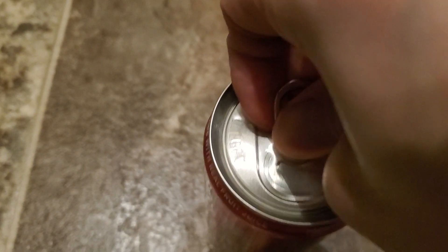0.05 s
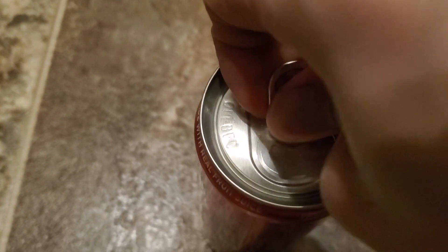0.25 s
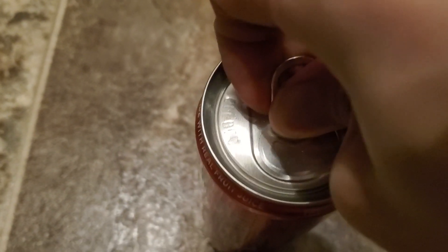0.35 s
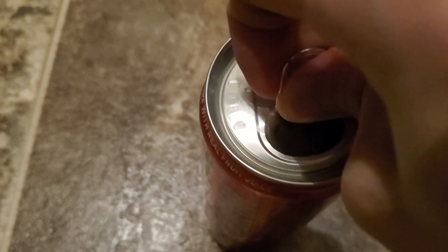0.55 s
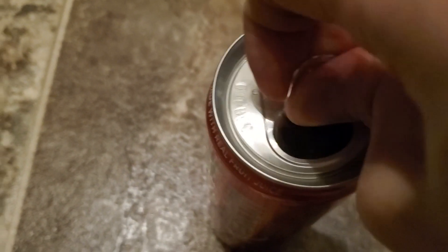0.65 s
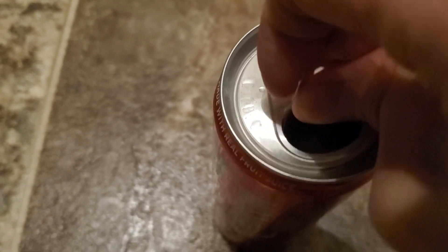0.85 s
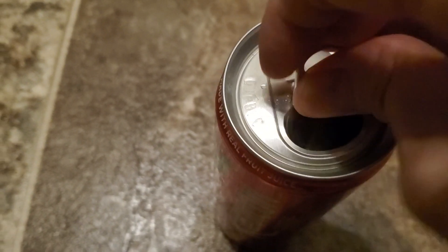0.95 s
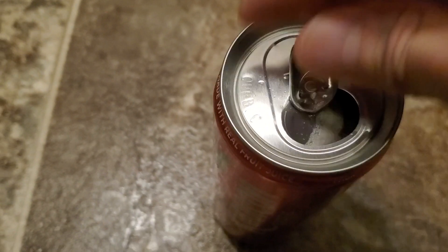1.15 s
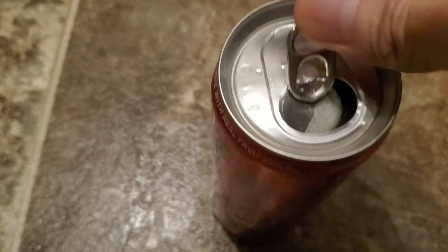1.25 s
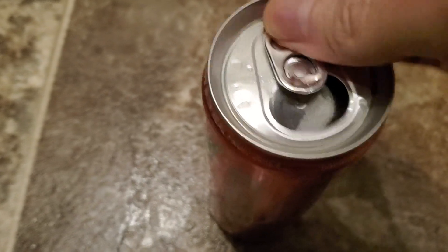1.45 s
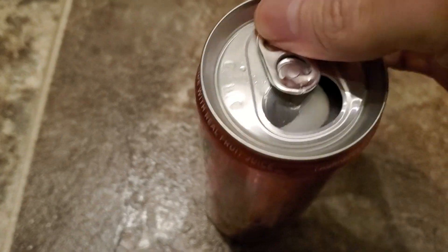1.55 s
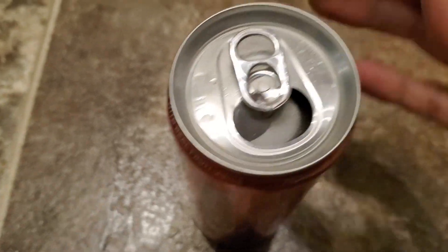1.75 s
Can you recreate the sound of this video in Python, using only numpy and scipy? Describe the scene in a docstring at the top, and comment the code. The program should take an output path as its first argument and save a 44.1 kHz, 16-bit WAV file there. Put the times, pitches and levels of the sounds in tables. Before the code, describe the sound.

A drinks can is cracked open with sharp metallic snaps and short bursts of hissing gas

```python
"""In a small hard room, a finger pulls the tab of a drinks can. The seal cracks, then the scored panel tears in two
snaps, made of short ringing packets. Gas, made of coloured noise, rushes out after each, only briefly after the second.
The bending tab ticks on the lid and rings the air gap under the opening; decaying noise bursts and struck resonances
make these. Leaking gas hisses and whistles, and a rub makes the can sing with a wavering sine. A low appliance hum,
rumble and faint hiss lie beneath."""
import sys
import numpy as np
from scipy import signal
from scipy.fft import rfft, irfft
from scipy.io import wavfile

SR = 44100
rng = np.random.default_rng(int(sys.argv[2]) if len(sys.argv) > 2 else 0)


def put_to_file(sound):
    """Save the sound as 16-bit audio at rate SR, in the file named by the first command-line argument."""
    columns = np.atleast_2d(sound).T  # one column per channel
    safe = np.clip(columns, -1, 1)
    whole_steps = np.round(safe * 32767)
    wavfile.write(sys.argv[1], SR, whole_steps.astype(np.int16))


def natural_amplitude(level_db):
    """Convert a level in decibels to a linear amplitude factor, elementwise."""
    exponent = np.asarray(level_db, float) / 20
    return 10 ** exponent


N = 79380  # 1.8 s
TIME_S = np.arange(N) / SR
SPECTRUM_HZ = np.maximum(np.arange(N // 2 + 1) * SR / N, 1)
TREBLE_BAND_HZ = (7000, 15500)


def rms_one(x):
    """Scale to unit rms."""
    return x / np.sqrt(np.mean(x ** 2) + 1e-20)


def in_time(rows):
    """Join the columns of a table by straight lines in time."""
    times, *columns = np.transpose(rows)
    return [np.interp(TIME_S, times, column) for column in columns]


def at_hz(points, hz):
    """Read a table on a log-frequency axis."""
    table_hz, values = np.array(points).T
    return np.interp(np.log(hz), np.log(table_hz), values)


def drift(rate_hz):
    """Smoothed noise of rms 1 that wanders faster at a higher rate."""
    step = 20  # samples between drawn values
    r = np.exp(-2 * np.pi * step * rate_hz / SR)
    noise = rng.standard_normal(N // step + 2002)
    slow = signal.lfilter([1], [1, -2 * r, r * r], noise)[2000:]  # skip the start-up
    return np.interp(np.arange(N) / step, np.arange(len(slow)), rms_one(slow))


def ring(clicks, hz, t60):
    """A resonance: a unit click starts a sine of height 1 that falls 60 dB in t60 seconds."""
    r = natural_amplitude(-60 / (max(t60, .001) * SR))
    w = 2 * np.pi * hz / SR
    return signal.lfilter([0, np.sin(w)], [1, -2 * r * np.cos(w), r * r], clicks + 1e-18)


def band(x, edges_hz):
    """Fourth-order band-pass."""
    return signal.sosfilt(signal.butter(2, edges_hz, "band", fs=SR, output="sos"), x)


def steep_band(x, edges_hz):
    """The same band-pass twice, for steeper sides."""
    return band(band(x, edges_hz), edges_hz)


def coloured(spectrum, alike):
    """Stereo noise of rms 1 with a given spectrum; alike 1 = same left and right, 0 = unrelated."""
    lowest, highest = spectrum[0][0], spectrum[-1][0]
    inside = (SPECTRUM_HZ > lowest) * (SPECTRUM_HZ < highest)
    gain = natural_amplitude(at_hz(spectrum, SPECTRUM_HZ)) * inside
    mid, side = rfft(rng.standard_normal((2, N))) * gain
    alike = np.clip(alike, -1, 1)
    both = np.sqrt(1 + alike) * mid + np.sqrt(1 - alike) * side * [[1], [-1]]
    return rms_one(irfft(both, N))


# how the background swells and sinks: (t/s, low level/dB, hiss level/dB)
BACKGROUND = [(0, -54.5, -65.5), (.2, -52.5, -65.5), (.55, -53, -66), (.8, -57.5, -69), (1.2, -58.5, -72),
              (1.5, -59, -71), (1.8, -54, -65.5)]
# colour of the low rumble: (f/Hz, level/dB per Hz, relative)
RUMBLE = [(15, -65), (25, -18.5), (70, -12), (109, -1), (146, -12.5), (216, -11.5), (244, -12.5),
          (375, -18), (430, -23), (718, -19), (1120, -30), (1500, -32), (1950, -70), (3300, -120)]
# colour of the faint hiss: (f/Hz, level/dB per Hz, relative)
HISS = [(880, -30), (1500, -7), (1960, -9), (3330, -11), (5310, -8.5), (6130, -0.5), (7080, -20.5),
        (10500, -22.5), (12300, -24), (13500, -51), (22000, -120)]
# how alike left and right are: (f/Hz, likeness from -1 to 1)
LIKENESS = [(60, 1), (180, 0.93), (550, 0.45), (1650, 0.33), (4970, -0.44), (15000, 0.73)]
# how far the sound leans to one side: (f/Hz, left-over-right level/dB)
LEANING = [(60, 2), (180, -6), (550, -2.5), (1650, 1.5), (4970, 0), (15000, -3.5)]
# appliance hum lines: (f/Hz, level/dB relative to the low background, wavering rate/Hz)
HUMS = [(115.1, -14, 30), (215.9, -2.5, 2)]


def background():
    """Filtered noise makes room rumble and faint hiss; two wavering sines make the appliance hum."""
    low_db, hiss_db = in_time(BACKGROUND)
    alike = at_hz(LIKENESS, SPECTRUM_HZ)
    hum = np.zeros(N)
    for hz, db, rate_hz in HUMS:
        height = natural_amplitude(db) * (1 + 0.22 * drift(rate_hz))
        hum += height * np.sin(2 * np.pi * hz * TIME_S + 0.5 * drift(rate_hz))
    rumble = natural_amplitude(-3.5) * coloured(RUMBLE, alike)
    both = natural_amplitude(low_db) * (rumble + hum) + natural_amplitude(hiss_db) * coloured(HISS, alike)
    lean_db = at_hz(LEANING, SPECTRUM_HZ) / 2
    return irfft(rfft(both) * natural_amplitude([lean_db, -lean_db]), N)


# the hand slides on the can: (middle t/s, half length/s, level/dB, low f/Hz, high f/Hz)
RUB = (.98, 0.08, -66, 650, 900)


def rub():
    """Friction of hand on can: dull, uneven noise that swells and fades."""
    middle, half_length, db, low_hz, high_hz = RUB
    swell = np.exp(-0.5 * ((TIME_S - middle) / half_length) ** 2)
    noise = rms_one(band(rng.standard_normal((2, N)), (low_hz, high_hz)))
    return natural_amplitude(db + 3 * drift(40)) * swell * noise


# rubbing makes the air gap sing: (t/s, f/Hz, level/dB)
SING = [(.875, 1260, -85), (.892, 1260, -62), (.912, 1250, -68), (.93, 1240, -59), (.945, 1200, -57),
        (.962, 1150, -59), (.978, 1120, -85)]


def singing():
    """Rubbing makes the air gap sing: a sine of sinking pitch, wavering in level and phase."""
    hz, db = in_time(SING)
    waver_hz = 40
    height = natural_amplitude(db) * (1 + 0.41 * drift(waver_hz))
    return height * np.sin(2 * np.pi * np.cumsum(hz) / SR + 0.71 * drift(waver_hz))


# the can shifts in the hand: (middle t/s, level/dB, f/Hz, length/s)
THUMPS = [(.272, -43, 110, 0.028), (.515, -39, 169, 0.028), (0.52, -44.5, 95.7, 0.036),
          (0.81, -54, 457, 0.013), (0.853, -57, 430, .008), (0.557, -58.5, 422, 0.098)]


def thumps():
    """Dull thumps of the shifting can: soft swells of a sine."""
    out = np.zeros(N)
    for middle, db, hz, length in THUMPS:
        t = TIME_S - middle
        swell = np.exp(-0.5 * (t / (length / 3)) ** 2)
        out += natural_amplitude(db) * swell * np.sin(2 * np.pi * hz * t)
    return out


# the last gas leaks past the tab: (t/s, hiss level/dB, whistle f/Hz, whistle level/dB)
LEAK = [(.17, -82, 4490, -90), (.19, -77, 4315, -77.5), (.3, -71, 4250, -51), (.45, -78.5, 4210, -73),
        (.55, -63, 3797, -49), (.63, -62, 3750, -53), (.76, -60, 3613, -62.5), (.83, -100, 3680, -90),
        (1.8, -105, 3680, -95)]
# colour of the leaking hiss: (f/Hz, level/dB per Hz, relative)
LEAK_COLOUR = [(1180, -42), (2000, -5.5), (3840, -13.5), (7390, -14), (14000, -11), (16500, -25.5)]


def leak():
    """The remaining gas hisses thinly and makes the lid whistle, a sine blurred by fast random wavering."""
    hiss_db, whistle_hz, whistle_db = in_time(LEAK)
    hiss = natural_amplitude(hiss_db + 2 * drift(60)) * coloured(LEAK_COLOUR, 0.95)
    phase = 2 * np.pi * np.cumsum(whistle_hz) / SR
    blur_hz = 170
    whistle = [drift(blur_hz) * np.sin(phase) + drift(blur_hz) * np.cos(phase) for side in "LR"]
    return hiss + natural_amplitude(whistle_db) * np.array(whistle)


# the released tab twangs: (t/s, level/dB, top tone level/dB)
TWANGS = [(1.11, -45, -40), (1.1446, -36, -65), (1.675, -51.5, -73)]
# main tones of the tab: (f/Hz, level/dB relative to the twang, 60 dB decay time/s)
TAB = [(3100, -18, 0.08), (3376, 1.5, 0.031)]


def twangs():
    """The free end of the released tab rings: clicks excite its main tones and a shorter top tone."""
    clicks, top_clicks = np.zeros((2, N))
    for s, db, top_db in TWANGS:
        clicks[int(s * SR)] = natural_amplitude(db)
        top_clicks[int(s * SR)] = natural_amplitude(top_db)
    main = sum(natural_amplitude(db) * ring(clicks, hz, t60) for hz, db, t60 in TAB)
    return band(main, (2900, 3600)) + ring(top_clicks, 4170, 0.02)


# tones of the lid, which rings briefly: (f/Hz, level/dB relative to the strike, 60 dB decay time/s)
LID = [(3750, -22.5, 0.05), (4250, -26.5, 0.04), (5480, -23.5, 0.021), (6580, -20.5, 0.0064),
       (8230, -21, 0.0062)]


def lid_ring(click):
    """A strike rings every tone of the lid, each a little stronger or weaker by chance."""
    luck_db = 2.5 * rng.standard_normal(len(LID))
    return sum(natural_amplitude(db + extra) * ring(click, hz, t60) for (hz, db, t60), extra in zip(LID, luck_db))


def contacts(rows, band_hz, t60, lid_db, gap_t60):
    """Each contact is a dry burst of noise that also strikes the lid and the air gap."""
    burst_trim_db, treble_trim_db, gap_trim_db = -8.5, 8.5, 8
    out, span = np.zeros(N), SR // 10
    click = np.zeros(span)
    click[0] = 1
    fade = natural_amplitude(-60 * np.arange(span) / SR / t60)
    for s, db, gap_hz, gap_db, treble_db in rows:
        noise = rng.standard_normal(span)
        burst = natural_amplitude(burst_trim_db) * rms_one(steep_band(noise, band_hz)) * fade
        lid = natural_amplitude(lid_db) * band(lid_ring(click), band_hz)
        treble = natural_amplitude(treble_db + treble_trim_db) * rms_one(band(noise, TREBLE_BAND_HZ)) * fade
        gap = natural_amplitude(gap_db + gap_trim_db) * ring(click, gap_hz, gap_t60)
        start = int(s * SR)
        out[start:start + span] += natural_amplitude(db) * (burst + lid) + treble + gap
    return out


# a fingertip taps the tab; levels are before the trims in contacts():
# (t/s, level/dB, air-gap f/Hz, air-gap level/dB, treble level/dB)
TAPS = [(1.1103, -33, 1222, -43, -92), (1.1454, -49, 1200, -61, -88), (1.4935, -44, 1316, -57, -72),
        (1.498, -38, 1122, -68, -58), (1.6724, -46, 1105, -60, -82)]


def taps():
    """A soft fingertip taps the tab: duller contacts that barely ring the lid."""
    return contacts(TAPS, band_hz=(1500, 5000), t60=0.0185, lid_db=-15, gap_t60=0.024)


# the tab ticks on the lid; levels are before the trims in contacts():
# (t/s, level/dB, air-gap f/Hz, air-gap level/dB, treble level/dB)
TICKS = [(0.183, -32.5, 1240, -72, -75), (0.391, -32, 1035, -67, -62), (0.6308, -34.5, 1314, -51, -52),
         (0.6518, -40, 1214, -57.5, -55.5), (0.6646, -50, 1360, -63, -57.5),
         (0.6784, -35, 1230, -59, -46.5), (0.7036, -29, 1175, -50.5, -44), (0.722, -27, 1177, -53, -47),
         (0.7401, -22.5, 1136, -42.5, -46.5), (0.7925, -35, 1206, -58, -55.5), (0.853, -64, 1178, -61, -81)]


def ticks():
    """The bending tab ticks on the lid: hard, bright contacts that ring lid and air gap."""
    return contacts(TICKS, band_hz=(3300, 7000), t60=0.01, lid_db=5.5, gap_t60=0.056)


# gas rushes out: (t/s, level/dB, share of the decay time)
RUSHES = [(0.23, -19.5, 0.81), (.458, -20.5, 0.2), (0.474, -19, 0.96)]
# colour of each rush, one list per rush: (f/Hz, level/dB per Hz, relative)
RUSH_COLOURS = [
    [(290, -45.5), (500, -27), (960, -21), (1570, -19.5), (2500, -10), (3210, -19), (4250, 5.5), (5600, -6),
     (6860, -16.5), (7940, -4), (9190, -18), (15700, -14.5), (16500, -46)],
    [(900, -26.5), (3200, -26.5), (3800, -5.5), (6000, -6.5), (9000, -10), (15500, -11.5)],
    [(300, -29), (600, -14), (1070, -1), (2210, -9), (3100, -5.5), (3900, 3.5), (6500, -5), (7300, -11),
     (9500, -5.5), (15800, -16), (16500, -55)],
]
# full decay time of the gas, before each rush takes its share: (f/Hz, 60 dB decay time/s)
RUSH_T60 = [(500, 0.34), (1000, 0.3), (2000, 0.29), (4200, 0.28), (6000, 0.27), (9000, 0.23), (15000, 0.22)]


def rushes():
    """Turbulent gas: patchy noise that starts fast and dies at its own pace in each band."""
    rise_s, patchy_db, pan_db = 0.0023, 2.5, 0.5
    out = np.zeros((2, N))
    edges_hz = 300 * 2 ** np.arange(0, 6.1, 0.3)
    for (s, db, share), colour in zip(RUSHES, RUSH_COLOURS):
        noise = rfft(coloured(colour, 0.075))
        age = np.maximum(TIME_S - s, 0)
        rise = 1 - np.exp(-age / rise_s)
        gust = drift(110)  # shared by all bands
        for low, high in zip(edges_hz, edges_hz[1:]):
            t60 = share * at_hz(RUSH_T60, np.sqrt(low * high))
            patches_db = patchy_db * (0.54 * gust + drift(220))
            in_band = (SPECTRUM_HZ >= low) * (SPECTRUM_HZ < high)
            out += irfft(noise * in_band, N) * natural_amplitude(db - 60 * age / t60 + patches_db) * rise
    return out * natural_amplitude([[pan_db / 2], [-pan_db / 2]])


# the lid cracks in runs of slips: (t/s, level/dB, f/Hz, air-gap level/dB, treble level/dB)
CRACKS = [(.2309, -24, 4500, -70, -44), (.2318, -8, 4200, -48, -20), (.2325, -3, 5500, -60, -28),
          (.2337, -17, 4400, -70, -34), (.2385, -18, 5000, -70, -34), (.4576, -5, 4900, -56, -14),
          (.4586, -12, 5800, -70, -22), (.4640, -17, 4800, -70, -32), (.4648, -18, 5800, -70, -32),
          (.4765, -2, 5500, -26, -15), (.4769, -4, 4000, -30, -28)]


def cracks():
    """Each slip is a packet of a few cycles that swells and dies, with a bright edge, a knock and the ringing can."""
    t60, band_hz = 0.0014, (3300, 12000)
    out, span = np.zeros(N), SR // 8
    click = np.zeros(span)
    click[0] = 1
    fade = natural_amplitude(-60 * np.arange(span) / SR / t60)
    for s, db, hz, gap_db, treble_db in CRACKS:
        packet = ring(ring(click, hz, t60), hz, t60)  # ringing twice makes it swell first
        packet = packet / np.abs(packet).max()
        slip = natural_amplitude(db) * steep_band(packet + lid_ring(click), band_hz)
        edge = natural_amplitude(treble_db) * band(rng.standard_normal(span) * fade, TREBLE_BAND_HZ)
        knock = natural_amplitude(db - 5.5) * band(click, (560, 2600))  # the wall of the can jolts
        gap = natural_amplitude(gap_db) * ring(click, 1061, 0.079)
        start = int(s * SR)
        out[start:start + span] += slip + edge + knock + gap
    return out


def placed(x, pan_db):
    """A near source: louder and earlier on the left."""
    lag_s = 0.00011
    late = np.interp(np.arange(N) - lag_s * SR, np.arange(N), x)
    return np.array([x * natural_amplitude(pan_db / 2), late * natural_amplitude(-pan_db / 2)])


def room(x):
    """Echoes between hard walls: eight feedback delays a side, duller on every round."""
    t60, wall_cut_hz = 0.37, 4700  # the duller treble dies sooner than t60
    out = np.zeros((2, N))
    dull = np.exp(-2 * np.pi * wall_cut_hz / SR)
    lags = (rng.uniform(0.0065, 0.025, 16) * SR).astype(int)
    for k, lag in enumerate(lags):
        loop, state = x.copy(), [0.]
        gain = natural_amplitude(-60 * lag / SR / t60)
        for i in range(lag, N, lag):
            back, state = signal.lfilter([gain * (1 - dull)], [1, -dull], loop[i - lag:i], zi=state)
            loop[i:i + lag] += back[:N - i]
        out[k % 2] += (loop - x) * (-1) ** (k // 2)
    return out


def scene():
    """The can close to the left, in the room, over the background."""
    thin = signal.butter(2, 907, "high", fs=SR, output="sos")  # a small can gives little bass
    loud = signal.sosfilt(thin, cracks())
    small = signal.sosfilt(thin, ticks() + taps() + twangs() + singing())
    near = placed(loud, pan_db=15) + placed(small, pan_db=7.5)
    echoes = natural_amplitude(-15) * room(loud + natural_amplitude(-4.5) * small)  # small sounds wake the room less
    return near + echoes + rushes() + leak() + thumps() + rub() + background()


def top_cut(x):
    """Nothing passes above the cut-off."""
    return signal.sosfilt(signal.butter(12, 17000, fs=SR, output="sos"), x)


def record(dry):
    """The top treble is cut, a limiter ducks everything for a moment at loud peaks, and the tops are rounded."""
    limit_db, share, release_db_per_s, smooth_s = -12.5, 0.16, 497, 0.0033
    soft_top = 1.1
    dry = signal.sosfilt(signal.butter(8, 16400, fs=SR, output="sos"), dry)
    peak_db = 20 * np.log10(np.abs(dry).max(axis=0) + 1e-9)
    over_db = np.maximum(peak_db - limit_db, 0)
    ramp = release_db_per_s * TIME_S
    held_db = np.maximum.accumulate(over_db + ramp) - ramp  # jumps up, then falls steadily
    r = np.exp(-1 / (smooth_s * SR))
    smooth_db = signal.lfilter([1 - r], [1, -r], held_db)
    ducked = dry * natural_amplitude(-share * smooth_db)
    mix = soft_top * np.tanh(ducked / soft_top)
    return top_cut(mix)


dry = scene()
out = record(dry)
put_to_file(out)
```